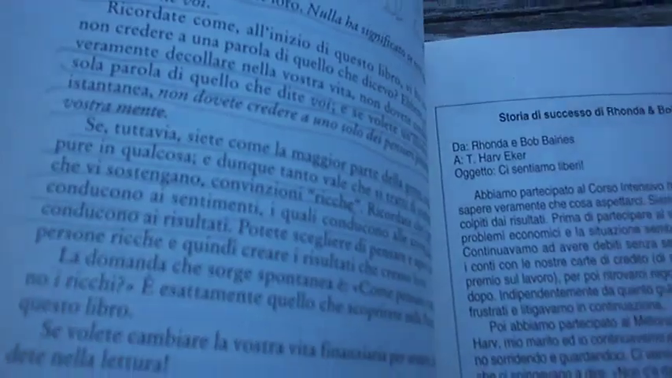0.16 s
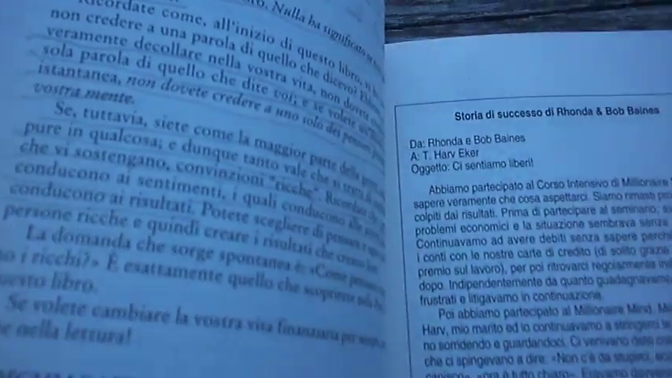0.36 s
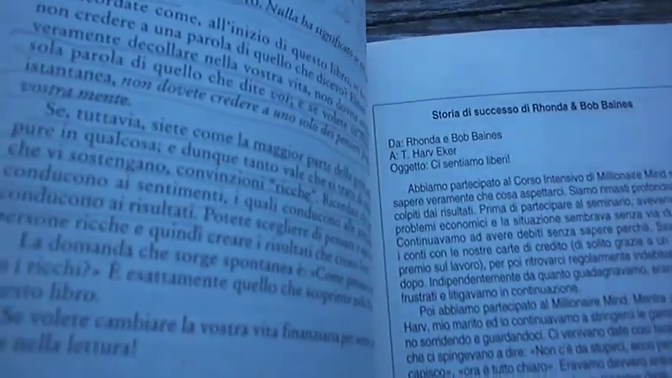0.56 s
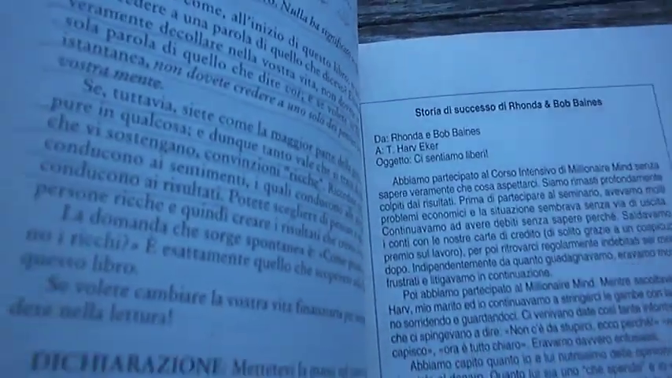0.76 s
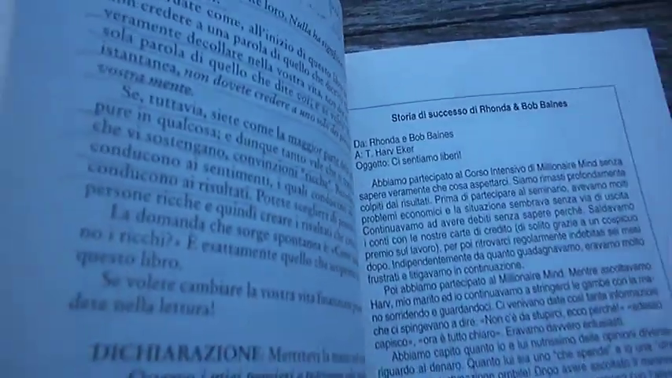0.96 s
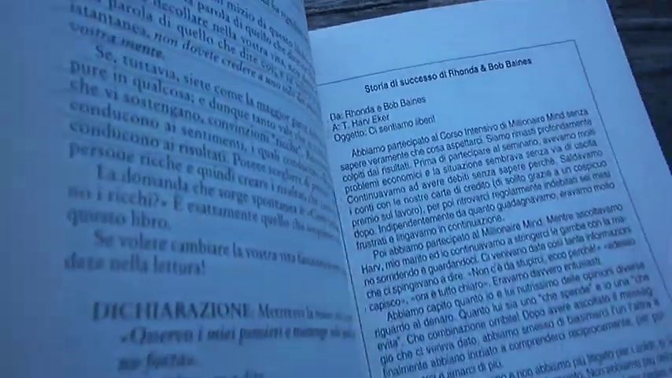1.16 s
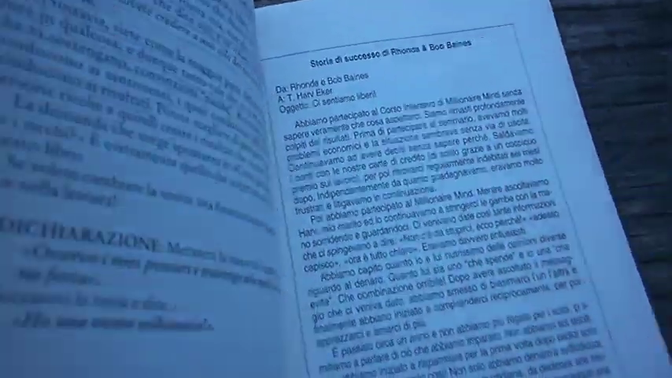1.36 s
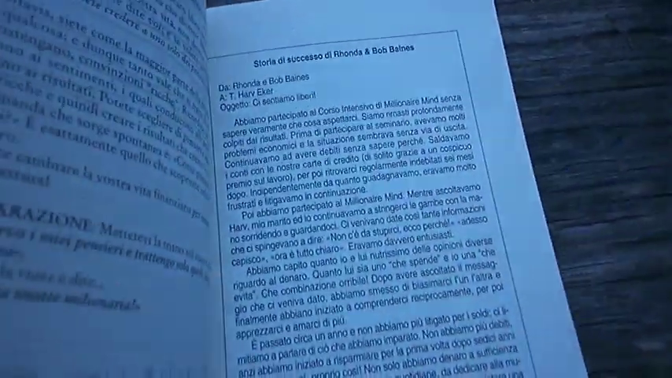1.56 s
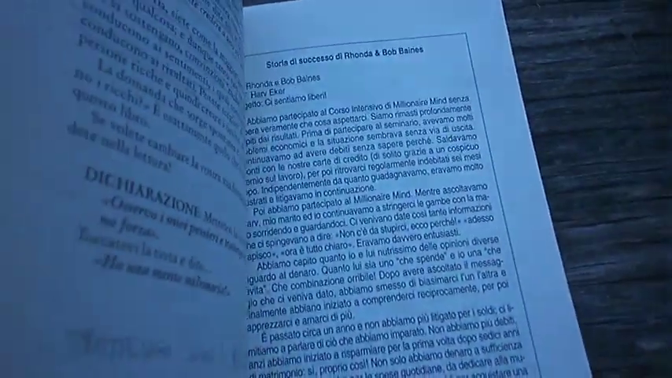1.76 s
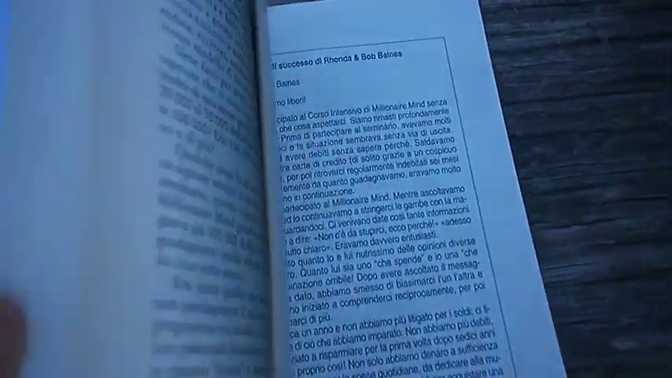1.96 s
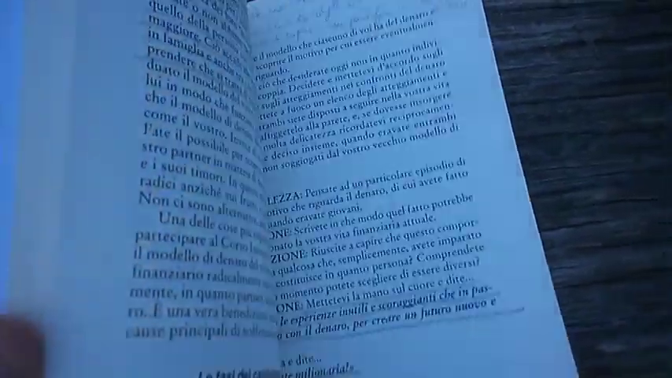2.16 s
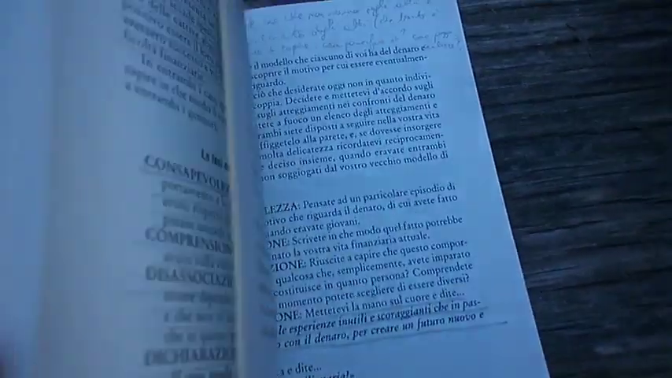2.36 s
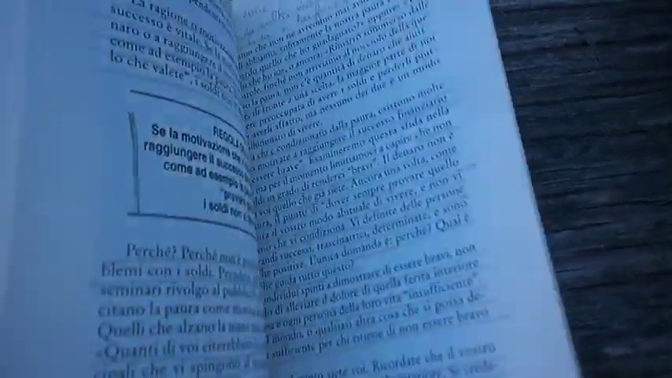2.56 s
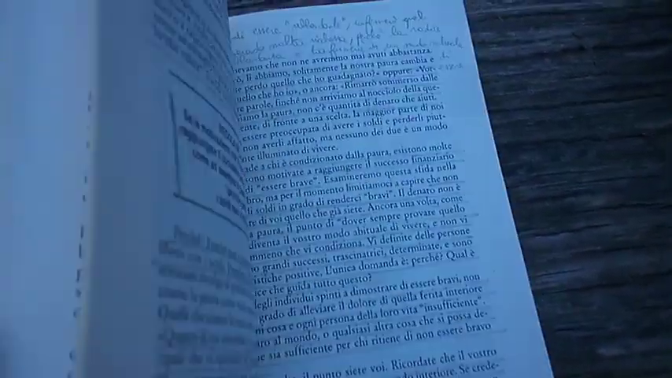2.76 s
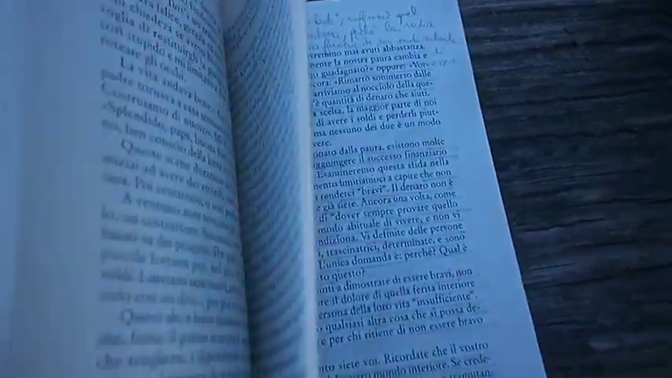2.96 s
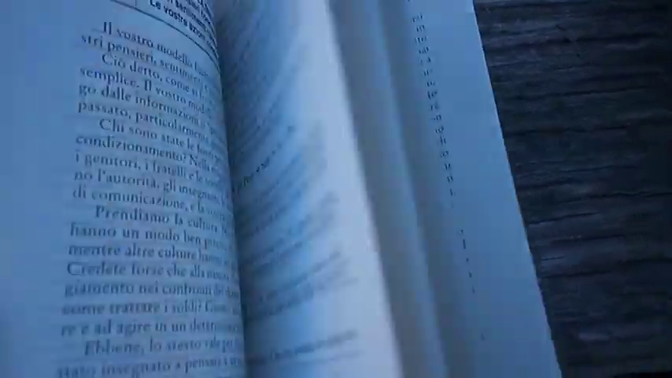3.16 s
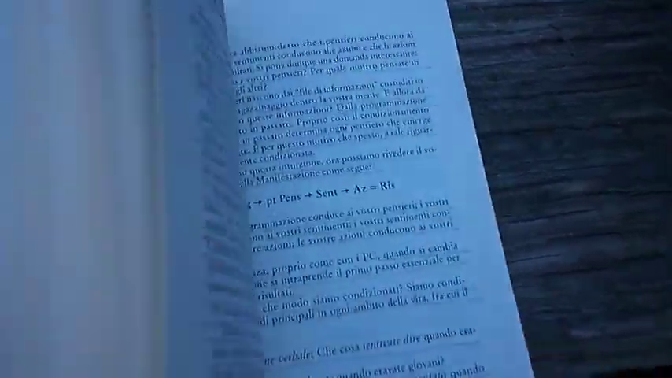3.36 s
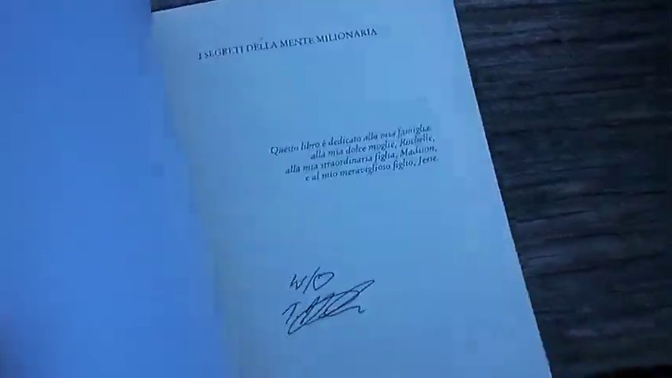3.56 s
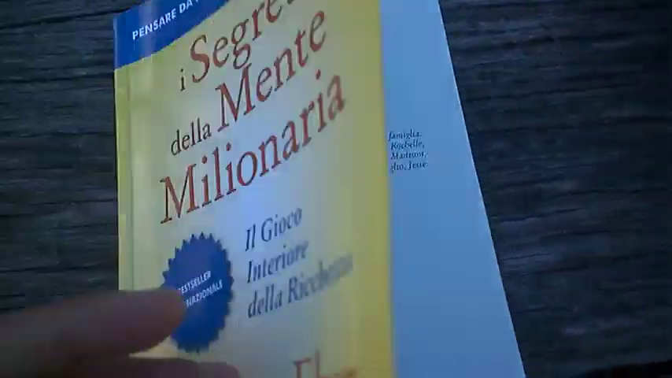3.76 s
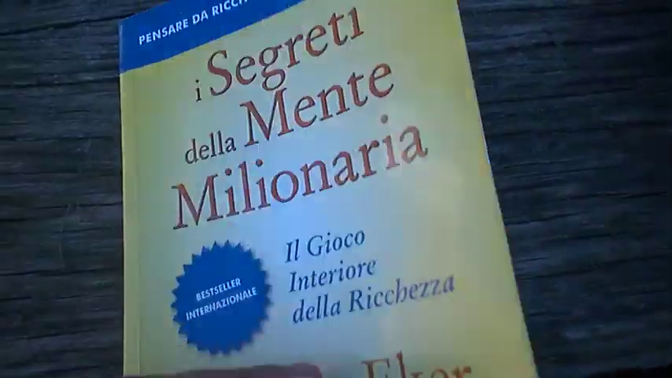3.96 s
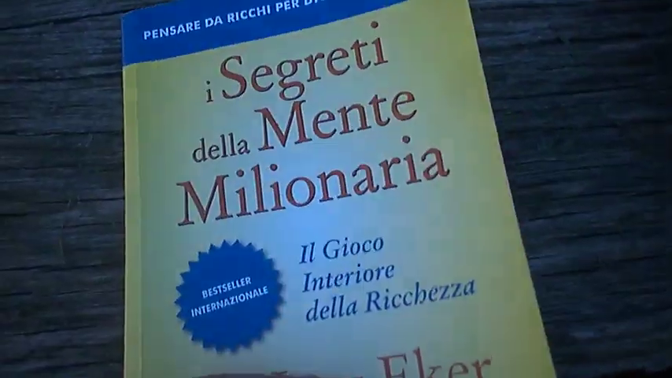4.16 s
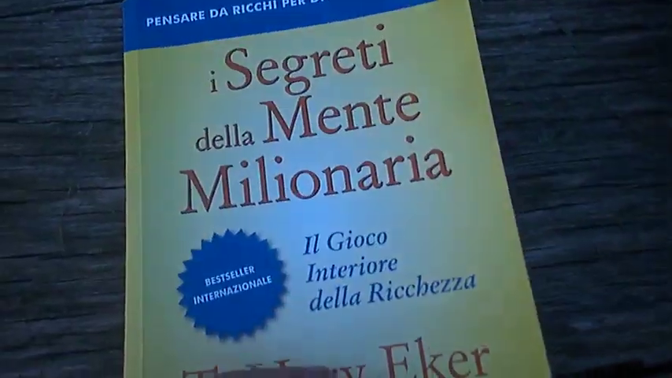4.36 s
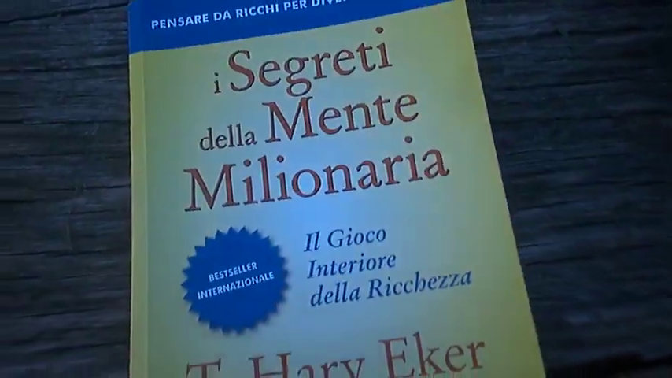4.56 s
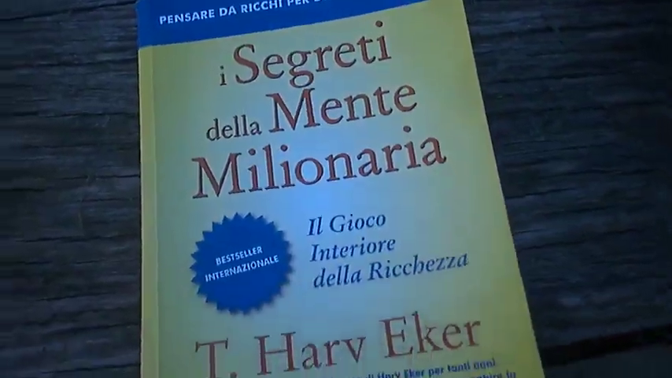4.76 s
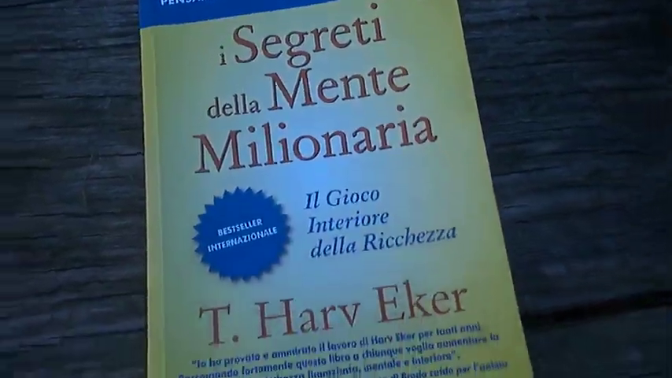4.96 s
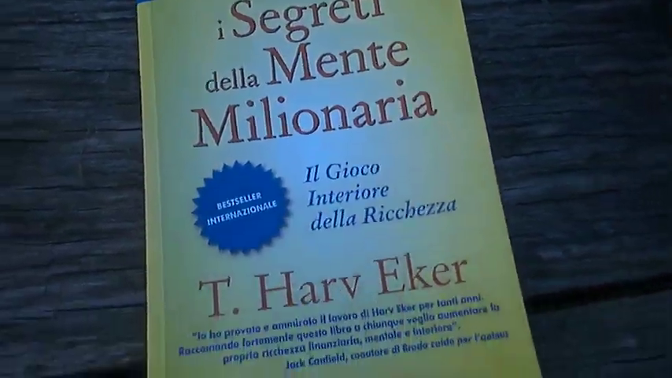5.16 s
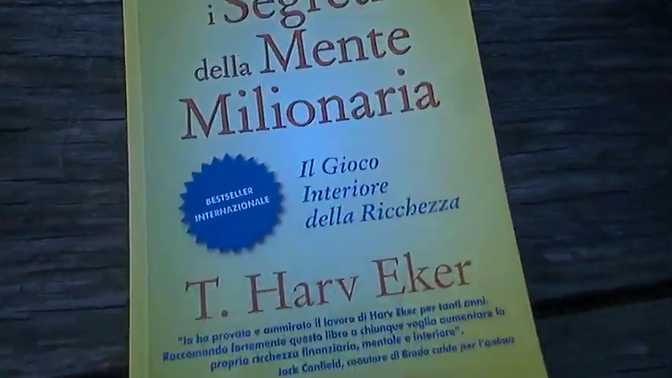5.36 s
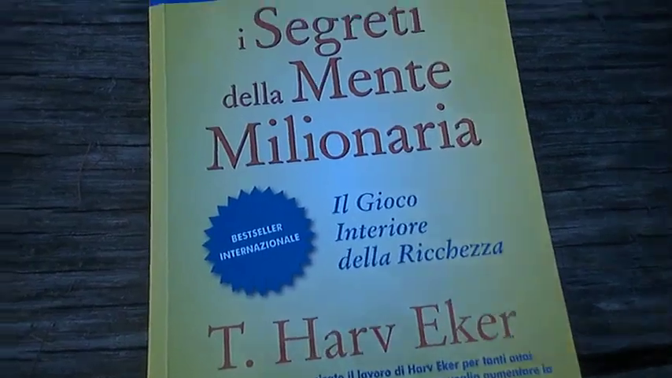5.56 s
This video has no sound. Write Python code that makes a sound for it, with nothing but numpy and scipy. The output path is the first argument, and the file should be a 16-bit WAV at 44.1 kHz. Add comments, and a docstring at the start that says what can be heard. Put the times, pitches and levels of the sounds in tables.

```python
"""The pages of a paperback flick past a thumb, then the cover falls shut on the book, which lies on a
wooden table. Stick-slip friction makes the page edges snap and drag and the sliding sheets hiss. Turning
pages displace puffs of air, the closing cover squeezes air from a resonant gap, and the hand's knocks
excite the table's modes. It is all heard over a dull background rush, through a recording chain with
three narrow notches and a treble cut near 8 kHz."""
import sys
import numpy as np
from scipy import signal
from scipy.fft import rfft, irfft
from scipy.io import wavfile
from scipy.ndimage import uniform_filter1d

SR = 44100
rng = np.random.default_rng(int(sys.argv[2]) if len(sys.argv) > 2 else 0)


def wav_out(sig):
    """Save sig, one row per channel (or a flat mono array), as 16-bit PCM at SR to the path in sys.argv[1]."""
    wavfile.write(sys.argv[1], SR, np.round(np.clip(np.atleast_2d(sig).T, -1, 1) * 32767).astype(np.int16))


N = 248150
COVER_S = 3.621   # the gap under the cover starts to close


def from_db(db):
    """Decibel scale: 20 dB is a factor of ten in amplitude."""
    return 10 ** (np.asarray(db) / 20)


def rms_one(x):
    """Power normalisation: scales a signal to rms 1."""
    return x / np.sqrt(np.mean(x ** 2) + 1e-20)


def drift(points_per_s):
    """Random modulation: standard normal values joined by straight lines."""
    points = rng.standard_normal(N // 100)
    return np.interp(np.arange(N) * points_per_s / SR, np.arange(len(points)), points)


def coloured(x, spectrum):
    """Spectral shaping by (frequency [Hz], level [dB]) points on a log axis; rms 1."""
    hz, level_db = np.transpose(spectrum)
    bin_hz = np.maximum(np.arange(N // 2 + 1) * SR / N, 1)
    gain = from_db(np.interp(np.log(bin_hz), np.log(hz), level_db))
    return rms_one(irfft(rfft(x) * gain, N))


def resonance(x, hz, width_hz):
    """Forced response of a damped resonator: a two-pole band with peak gain 1."""
    r = np.exp(-np.pi * width_hz / SR)
    gain = (1 - r * r) / 2
    return signal.lfilter([gain, 0, -gain], [1, -2 * r * np.cos(2 * np.pi * hz / SR), r * r], x)


def steep_band(x, hz, width_hz):
    """Two equal resonators in cascade: a narrower band with steeper skirts."""
    return resonance(resonance(x, hz, width_hz), hz, width_hz)


def ring(clicks, hz, t60):
    """Free vibration of one mode: a unit click starts a unit sine that falls 60 dB in t60 seconds."""
    r, w = 10 ** (-3 / (t60 * SR)), 2 * np.pi * hz / SR
    return signal.lfilter([0, np.sin(w)], [1, -2 * r * np.cos(w), r * r], clicks + 1e-18)


def fibre_slips(per_s, spread_db):
    """Stick-slip of paper fibres as a Poisson train of clicks of uneven size; rms 1."""
    sizes = from_db(spread_db * np.minimum(rng.exponential(1, N), 4)) * rng.choice([-1, 1], N)
    return rms_one(sizes * (rng.random(N) < per_s / SR))


def paper_voice(slips, hz, breadth, pile_db):
    """Source and filter: slips drive a broad band of the sheet and a dull one of the pile under it."""
    sheet = steep_band(slips, hz, width_hz=breadth * hz)
    pile = steep_band(slips, hz=860, width_hz=1500)
    return sheet + from_db(pile_db) * pile


def table_reflection(x):
    """Interference with one close echo from the table top comb-filters the sound."""
    delay_s, echo_gain = 0.00055, 0.27
    lag = round(delay_s * SR)
    return x + echo_gain * np.append(np.zeros(lag), x[:-lag])


def background_rush():
    """Coloured Gaussian noise: a dull rush whose level wavers slightly."""
    # spectrum of the rush: (frequency [Hz], relative level [dB])
    spectrum = [(18, -47.5), (30, -15.5), (141, -1.5), (437, 1), (744, -1.5), (1030, -7.5), (2780, -18),
                (6230, -21), (7500, -34.5), (9750, -54.5), (16500, -120)]
    return from_db(-45.5 + drift(7.3)) * coloured(rng.standard_normal(N), spectrum)


def table_knocks():
    """Modal vibration: soft blows of the hand ring the top's low mode and its short-lived upper ones."""
    # blows: (time [s], low mode level [dB], upper modes level [dB])
    blows = [(3.526, -67.5, -28.5), (5.095, -53, -33.5), (5.107, -23, -40), (5.183, -55, -32.5),
             (5.296, -32.5, -48)]
    # the top's low mode: (frequency [Hz], t60 [s])
    low_mode = (113, 0.26)
    # its upper modes: (frequency [Hz], gain [dB], t60 [s])
    upper_modes = [(225, 0.5, 0.048), (344.5, 5, 0.068), (470, 8, 0.051), (757, 2.5, 0.023),
                   (1800, 6.5, 0.012)]
    times, low_db, upper_db = np.transpose(blows)
    at, clicks = np.round(times * SR).astype(int), np.zeros((2, N))
    clicks[0, at], clicks[1, at] = from_db(low_db), from_db(upper_db)
    thud = ring(clicks[0], *low_mode)
    rap = sum((-1) ** k * from_db(db) * ring(clicks[1], hz, t60)
              for k, (hz, db, t60) in enumerate(upper_modes))
    return uniform_filter1d(thud, size=100) + uniform_filter1d(rap, size=8)   # soft contact dulls both


def air_puffs():
    """Air displacement: each puff or soft push is 1.8 cycles of low pressure swing under a smooth hump."""
    # pressure pulses: (time [s], level [dB], frequency [Hz])
    pulses = [(.293, -40, 89), (1.039, -27.5, 135), (1.174, -34, 115), (1.865, -34, 106), (2.605, -33, 89),
              (3.156, -39, 81), (3.509, -36, 84), (3.628, -23.5, 129), (3.643, -32, 97),
              (3.882, -34.5, 130), (4.025, -35, 81.5)]
    out = np.zeros(N)
    for start, level_db, hz in pulses:
        cycles = np.arange(round(1.8 * SR / hz)) * hz / SR
        hump = np.sin(np.pi * cycles / cycles[-1]) ** 2
        at = round(start * SR) + np.arange(len(cycles))
        out[at] += from_db(level_db) * hump * np.sin(2 * np.pi * cycles)
    return out


def hollow_rub():
    """Cavity resonance: the air pocket between the curved pages colours the noise of rubbing."""
    # course of the rubbing: (time [s], level [dB])
    course = [(.4, -45), (.53, -47), (.58, -74), (.65, -49.5), (.73, -48.5), (.76, -41.5), (.88, -45.5),
              (.99, -45.5)]
    # modes of the pocket: (frequency [Hz], width [Hz], gain [dB])
    modes = [(2170, 600, 1), (3470, 420, -4)]
    friction = fibre_slips(per_s=7300, spread_db=0.5)
    voiced = sum(from_db(db) * steep_band(friction, hz, width_hz) for hz, width_hz, db in modes)
    fade_in, fade_out = (course[0][0] - .02, -90), (course[-1][0] + .02, -90)
    times, level_db = np.transpose([fade_in, *course, fade_out])
    return from_db(np.interp(np.arange(N) / SR, times, level_db)) * rms_one(voiced)


def closing_cover():
    """Flow excitation: air squeezed from the gap swells in its resonances until the cover lands."""
    # modes of the gap: (frequency [Hz], width [Hz], rms level while closing [dB])
    modes = [(943, 110, -27.5), (1770, 540, -17), (3200, 270, -19), (4630, 170, -22.5)]
    closing_s = .011
    progress = (np.arange(N) / SR - COVER_S) / closing_s
    closing = (progress > 0) & (progress < 1)
    flow = rng.standard_normal(N) * closing * (1 + progress)
    bands = [(resonance(flow, hz, width_hz), db) for hz, width_hz, db in modes]
    return sum(from_db(db) * band / band[closing].std() for band, db in bands)


def sheaf_swish():
    """Friction noise in a gliding band, which sinks as the last sheaf flattens ahead of the cover."""
    start_s, length_s, from_hz, to_hz = 3.42, 0.23, 4800, 3300
    out, window = np.zeros(N), np.hanning(512)
    slips = fibre_slips(per_s=15000, spread_db=2.5)
    for progress in np.linspace(0, 1, 33):   # overlapping slices
        at = round((start_s + progress * length_s) * SR) + np.arange(len(window))
        hz = from_hz * (to_hz / from_hz) ** progress
        hump = np.sqrt(np.sin(np.pi * progress) + 1e-9)
        out[at] += hump * window * rms_one(steep_band(slips[at], hz, width_hz=0.32 * hz))
    return from_db(-39) * out


def stroke_gains():
    """Incoherent sources add in power: gains of hiss and body from the strokes and the pages' creep."""
    # sheet over sheet: (time at full strength [s], swell [s], hold [s], hiss [dB], body [dB])
    strokes = [(0.416, 0.066, 0.092, -42, -75), (0.767, 0.086, 0.24, -48, -60),
               (1.11, 0.3, 0.037, -43, -37), (1.343, 0.2, 0.069, -36, -35),
               (1.734, 0.055, 0.032, -46.5, -46.5), (2.008, 0.088, 0.13, -42, -42.5),
               (2.524, .06, 0.015, -45, -45.5), (3.337, 0.16, 0.011, -39.5, -39.5),
               (3.418, 0.037, 0.092, -39, -43), (3.608, 0.055, 0.0032, -29, -35),
               (4.406, 0.19, 0.098, -43, -50.5), (4.658, 0.17, 0.031, -46, -46.5),
               (4.864, 0.11, 0.52, -46.5, -47), (5.62, 0.26, .01, -39, -40)]
    swell_db, release_db_per_s = 14, 302
    creep_hiss_db, creep_body_db, shut_drop_db = -53.5, -48.5, 7.5
    t = np.arange(N) / SR
    power = from_db(np.array([[creep_hiss_db], [creep_body_db]]) - shut_drop_db * (t > COVER_S)) ** 2
    for full, swell, hold, hiss_db, body_db in strokes:
        rise_db = swell_db * np.minimum(t - full, 0) / swell
        fall_db = release_db_per_s * np.maximum(t - full - hold, 0)
        envelope = from_db(np.maximum(rise_db - fall_db, -99))
        power += (from_db([[hiss_db], [body_db]]) * envelope) ** 2
    return np.sqrt(power)


def sliding_sheets():
    """Sliding friction: dense slips give a low body and a bright surface hiss that share one flutter."""
    # spectra of the sheet's body and surface: (frequency [Hz], relative level [dB])
    body_spectrum = [(150, -11.5), (300, -1), (700, 0), (1400, -5.5), (2200, -11), (4000, -43.5)]
    hiss_spectrum = [(600, -18), (1500, -3), (2500, -4), (4000, -3), (6500, -6.5), (8000, -8.5)]
    hiss_gain, body_gain = stroke_gains()
    flutter_db = 1.2 * drift(40) + 1.2 * drift(150)
    body = coloured(fibre_slips(per_s=9000, spread_db=4.5), body_spectrum)
    hiss = coloured(fibre_slips(per_s=20000, spread_db=4.5), hiss_spectrum)
    return from_db(flutter_db) * (body_gain * body + hiss_gain * hiss)


def sheaf_crackle():
    """Acoustic emission: the sheaf bent under the thumb gives off sparse, faint ticks."""
    start_s, length_s = 2.5, .35
    t = np.arange(N) / SR - start_s
    ticks = fibre_slips(per_s=33, spread_db=3.0) * (t > 0) * (t < length_s)
    return from_db(-72) * rms_one(paper_voice(ticks, hz=3780, breadth=1.1, pile_db=-11))


def edge_drags():
    """Sustained stick-slip: page edges dragged under the thumb give a stream of slips."""
    # drags: (time [s], length [s], level [dB], band centre [Hz])
    drags = [(0.985, 0.12, -47.5, 1490), (1.114, 0.033, -43, 1680), (1.614, 0.032, -42.5, 3330),
             (1.714, 0.052, -43, 1960), (2.486, 0.013, -32, 4070), (2.939, 0.0068, -33.5, 2960),
             (2.981, 0.019, -26.5, 3200), (3.16, 0.018, -23, 4000), (3.178, 0.011, -29, 4570),
             (3.24, 0.027, -27.5, 2800), (3.271, 0.028, -28.5, 3400), (3.309, 0.024, -24, 3470),
             (3.492, 0.13, -37, 1800), (3.624, 0.014, -34, 3470), (4.281, 0.2, -46.5, 1570),
             (4.598, 0.092, -47, 4900)]
    attack_s, decay_s = 0.0015, 0.0023
    out = np.zeros(N)
    slips = fibre_slips(per_s=9900, spread_db=4.0) * from_db(0.87 * drift(250))
    for start, length, level_db, hz in drags:
        at = round(start * SR) + np.arange(round((length + .01) * SR))
        t = (at - at[0]) / SR
        envelope = np.minimum(t / attack_s, 1) * np.exp(-np.maximum(t - length, 0) / decay_s)
        scrape = rms_one(paper_voice(slips[at], hz, breadth=0.77, pile_db=-3))
        out[at] += from_db(level_db) * envelope * scrape
    return out


def edge_snaps():
    """Elastic release: slips build up to one sharp impulse as a page edge lets go, then die away."""
    # releases: (time [s], level [dB], band centre [Hz], rise time constant [ms])
    releases = [(0.3225, -26.5, 4400, 2.1), (0.415, -33.5, 3100, 0.65), (0.4791, -32, 4400, 0.35),
                (0.9785, -28, 1140, 0.9), (1.128, -27, 1390, 0.59), (1.629, -33.5, 3050, 1.1),
                (1.872, -27, 4600, 3.7), (1.8805, -24.5, 3070, 1.1), (2.1253, -28.5, 5480, 2),
                (2.1301, -18, 4250, 0.67), (2.1727, -30, 3720, 0.7), (2.1798, -22, 2470, 4.3),
                (2.2019, -33, 3190, 0.8), (2.235, -35, 1980, 1.2), (2.252, -32, 2850, 0.7),
                (2.2643, -22, 4060, 1.1), (2.2728, -17.5, 4430, 1.7), (2.4755, -31.5, 4520, 0.83),
                (2.496, -26, 3470, 4.3), (2.6022, -37.5, 2500, 1.1), (2.617, -23.5, 3840, 3.2),
                (2.8000, -36.5, 6000, 0.6), (2.8317, -40, 4500, 0.72), (2.8579, -32, 4800, 0.45),
                (2.8634, -26, 4300, 0.79), (2.9186, -32, 3720, 0.6), (2.922, -28.5, 3950, 0.9),
                (2.9302, -28.5, 3200, 0.6), (2.9459, -26, 2340, 0.7), (2.987, -29, 3080, 0.6),
                (2.995, -26, 3830, 0.6), (2.9991, -17, 3000, 0.85), (3.1772, -22, 5100, 0.8),
                (3.18, -20, 5100, 0.71), (3.1831, -17, 4740, 1.7), (3.2617, -18.5, 4230, 1.1),
                (3.2875, -22, 3840, 1.2), (3.31, -20.5, 3470, 2.1), (3.3268, -10.5, 3340, 1.5),
                (3.4175, -37, 4500, 0.5), (3.523, -25, 1100, 0.6), (3.63, -17, 3800, 2.6),
                (3.6445, -30.5, 1500, 1.1), (3.8207, -25.5, 2550, 0.31), (3.8353, -20.5, 3400, 0.14),
                (4.6796, -38, 1250, 1.5), (4.932, -37.5, 1480, 0.74)]
    decay_ms = 1.05
    out, offsets = np.zeros(N), np.arange(-660, 1100)   # samples around the release
    ms = offsets * 1000 / SR
    slips = fibre_slips(per_s=9000, spread_db=3.0)
    for time, level_db, hz, rise_ms in releases:
        at = round(time * SR) + offsets
        envelope = np.exp(-np.abs(ms) / np.where(ms < 0, rise_ms, decay_ms))
        impulse = 1.72 * (ms == 0)
        snap = paper_voice(slips[at] * envelope + impulse, hz, breadth=1.35, pile_db=-8.5)
        loudest_rms = np.sqrt(uniform_filter1d(snap ** 2, size=30).max())
        out[at] += from_db(level_db) * np.sqrt(2) * snap / loudest_rms
    return out


def scene():
    """Superposition: paper, air and table sound over the rush in one channel."""
    rush = background_rush()
    flicks = table_reflection(edge_snaps() + edge_drags() + sheaf_crackle())
    paper = flicks + sliding_sheets() + hollow_rub() + closing_cover() + sheaf_swish()
    return (paper + air_puffs() + table_knocks() + rush)[None]


def record(dry):
    """Linear filtering: three narrow ringing notches and a treble cut near 8 kHz, faint fizz above it."""
    notches_hz, edge_hz, cutoff_hz = (3938, 5219, 5905), 7870, 9250
    for hz in notches_hz:
        dry = dry - resonance(dry, hz, width_hz=45)
    dry = dry - resonance(dry, edge_hz - 50, width_hz=500)   # a wider dip at the band edge
    bass_loss = signal.butter(2, 50, "high", fs=SR, output="sos")
    band_edge = signal.cheby2(6, 20, edge_hz, fs=SR, output="sos")   # lets faint fizz through above it
    final_cut = signal.cheby2(12, 45, cutoff_hz, fs=SR, output="sos")
    return signal.sosfilt(np.vstack([bass_loss, band_edge, final_cut]), dry)


dry = scene()
out = record(dry)
wav_out(out)
```